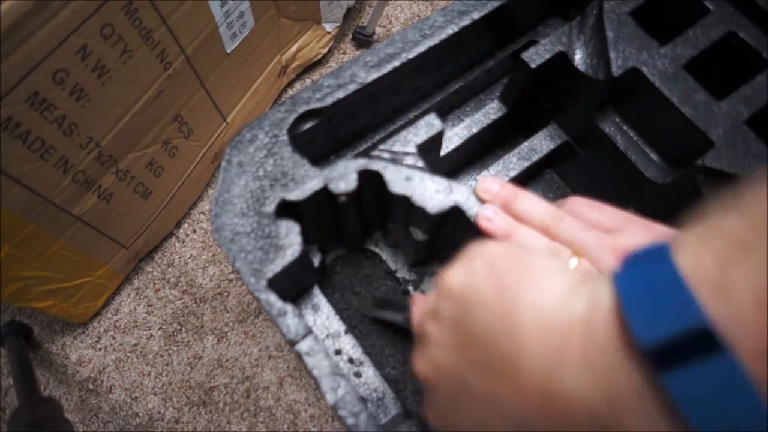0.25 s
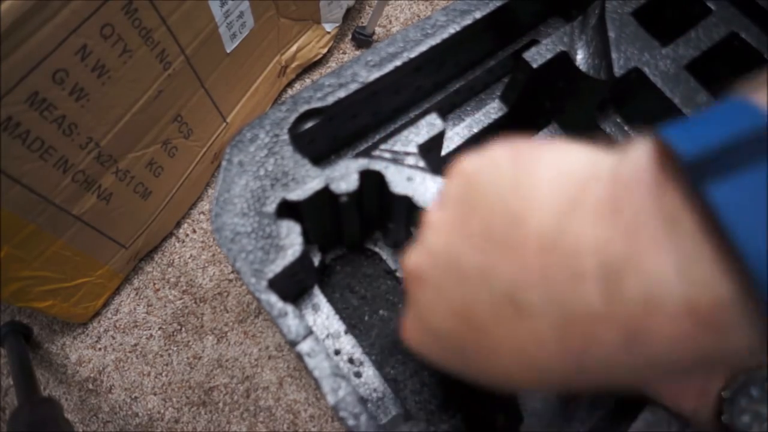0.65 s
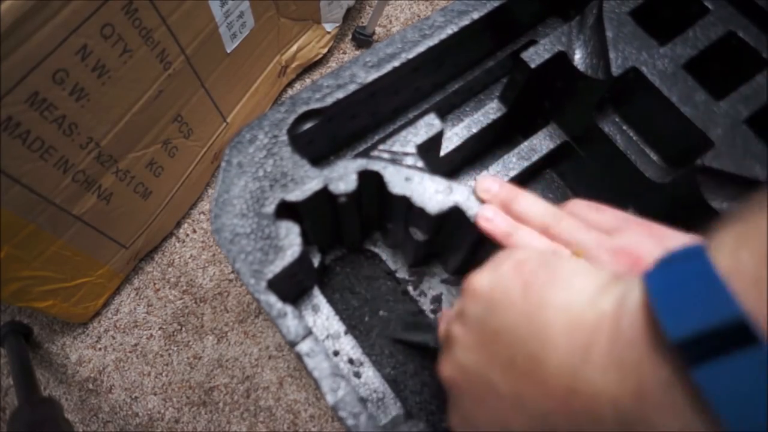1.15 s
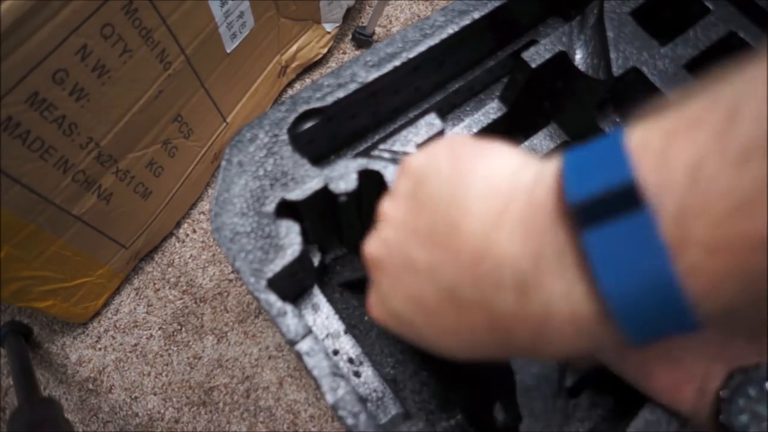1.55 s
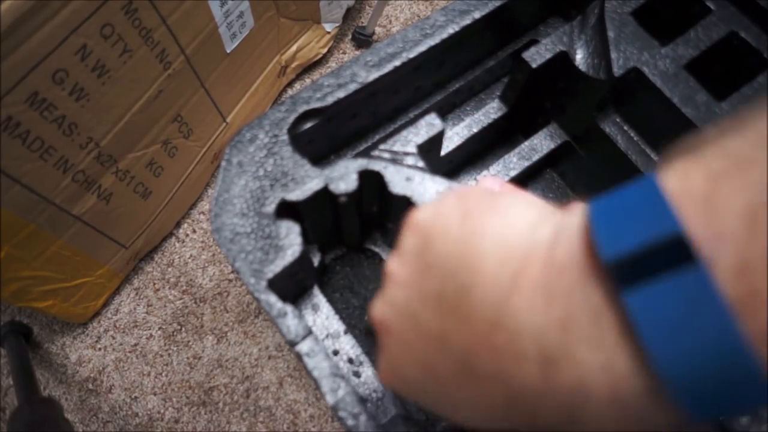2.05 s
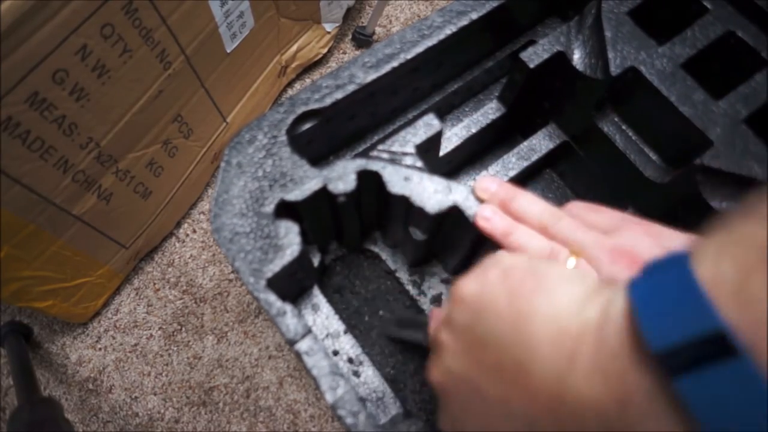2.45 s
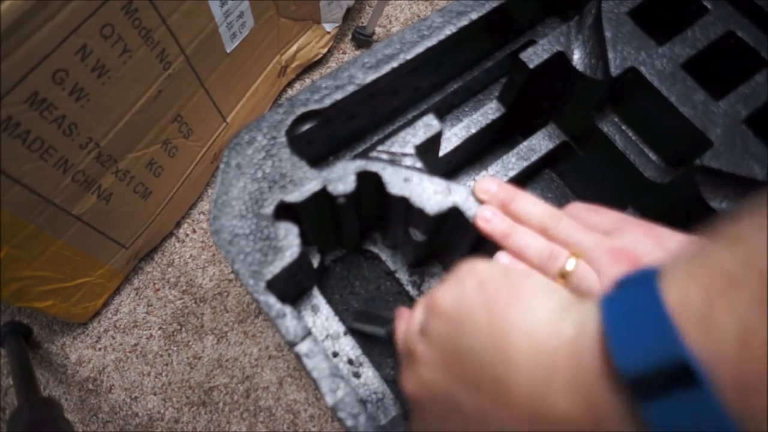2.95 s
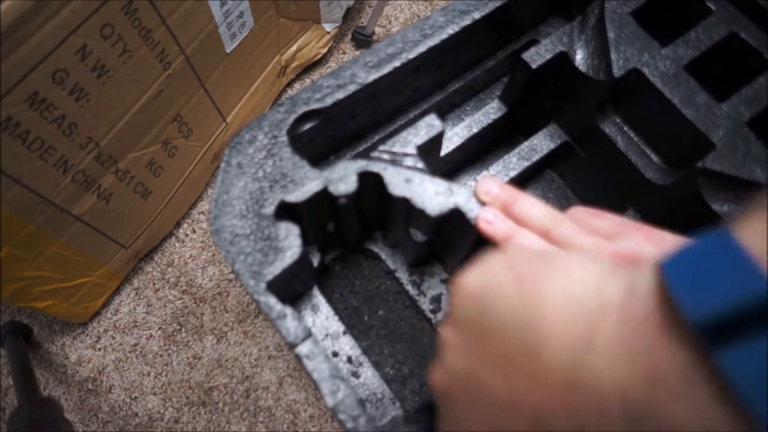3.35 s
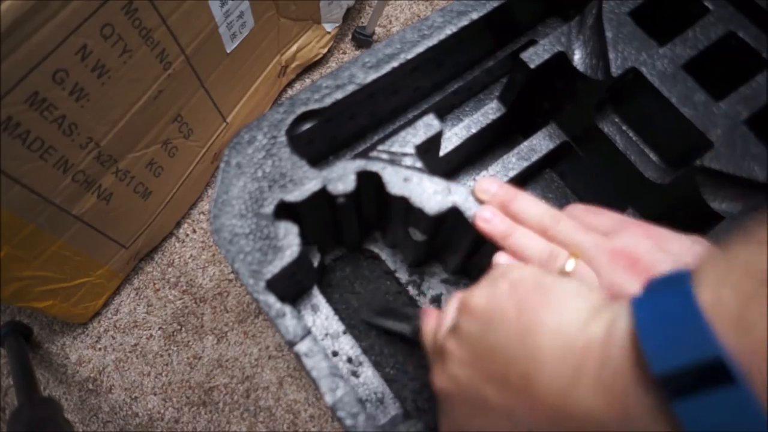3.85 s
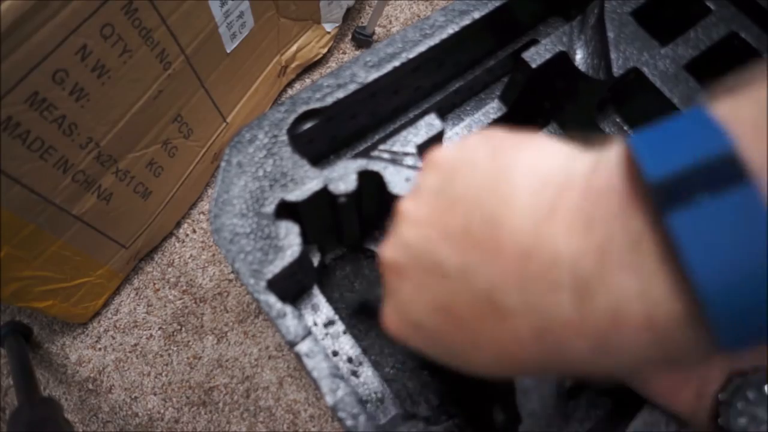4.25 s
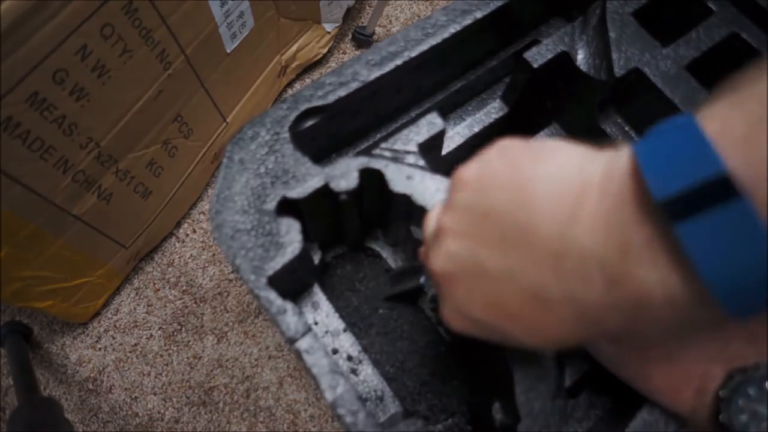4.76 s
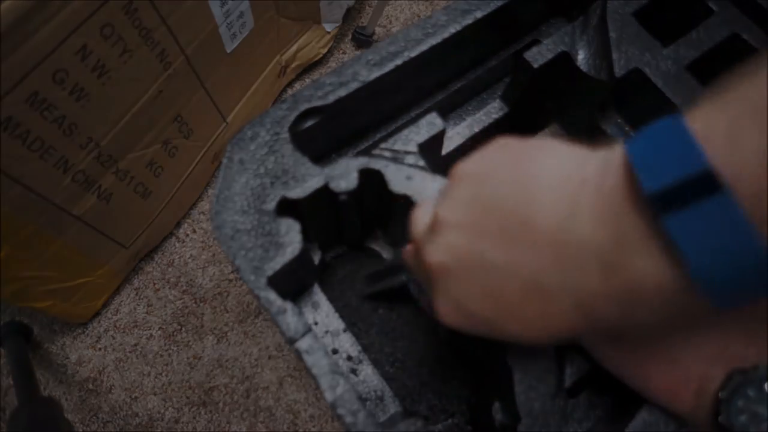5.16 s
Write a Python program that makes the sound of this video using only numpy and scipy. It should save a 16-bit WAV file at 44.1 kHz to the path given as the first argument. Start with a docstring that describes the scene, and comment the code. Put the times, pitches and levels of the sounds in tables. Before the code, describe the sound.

Short gritty scrapes through brittle foam, crackling and popping as tiny beads break, repeat about every two thirds of a second indoors.

```python
"""A faint room hum and a light rustle of the blade come first; then a flat chisel cuts bead foam in eight short strokes.
Each stroke is a few pushes that crush a stream of tiny beads, made as random bursts through minimum-phase clicks.
Single beads snap off: shaped noise forces excite damped resonances, as a crack, a tick of the blade and a thump of the foam.
Soft knocks of the block are decaying sines. Convolution adds the ceiling echo and short tail of a small carpeted room."""
import sys
import numpy as np
from scipy import signal
from scipy.fft import rfft, irfft, next_fast_len
from scipy.io import wavfile
from scipy.ndimage import uniform_filter1d

SR = 44100
rng = np.random.default_rng(int(sys.argv[2]) if len(sys.argv) > 2 else 0)


def master_out(mix):
    """Clip the mix to full scale and print it as 16-bit PCM to the path in sys.argv[1]."""
    frames = np.transpose(np.atleast_2d(mix))
    ceiling = np.clip(frames, -1, 1)
    pcm = np.round(ceiling * 32767).astype(np.int16)
    wavfile.write(sys.argv[1], SR, pcm)


N = 237775
TIME = np.arange(N) / SR
SIDES = np.array([[1], [-1]])  # sign of the side signal in left and right
CLICK_SIZE = 1024  # samples
CLICK_HZ = np.fft.rfftfreq(CLICK_SIZE, 1 / SR)
PADDED = next_fast_len(N, real=True)
FINE_HZ = np.fft.rfftfreq(PADDED, 1 / SR)


def undb(db):
    """Level law: decibels to amplitude gain."""
    return 10 ** (np.asarray(db) / 20)


def at(points, hz):
    """Logarithmic frequency scale: interpolate (f/Hz, value) points along it."""
    f, value = np.transpose(points)
    return np.interp(np.log(hz + 1), np.log(f), value)


def colour(x, points):
    """Zero-phase filtering: weight the spectrum by (f/Hz, gain/dB) points."""
    count = next_fast_len(x.shape[-1], real=True)
    gain = undb(at(points, np.fft.rfftfreq(count, 1 / SR)))
    return irfft(rfft(x, count) * gain, count)[..., :x.shape[-1]]


def lift(resonances, hz):
    """Resonance curves: the summed dB of (f/Hz, width/Hz, height/dB) peaks."""
    return sum(db / (1 + (2 * (hz - centre) / width) ** 2) for centre, width, db in resonances)


def unit(x):
    """Energy normalization: a mean energy of one per channel."""
    return x / np.sqrt(np.mean(np.sum(x ** 2, axis=-1)))


def add(out, s, sound):
    """Superposition: mix a sound in from a given time."""
    start = max(int(s * SR), 0)
    part = out[:, start:start + sound.shape[-1]]
    part += sound[..., :part.shape[-1]]


# Stereo width of the room sound: f/Hz, side against mid level/dB
ROOM_WIDTH = [(40, -9.5), (250, -15.5), (600, -10.5), (1500, -7), (4000, 0.5), (10000, -3.5)]


def diffuse(count):
    """Diffuse field: independent mid and side noises arrive from all around."""
    mid, side = rng.standard_normal((2, count))
    return mid + SIDES * colour(side, ROOM_WIDTH)


# Spectrum of the steady background: f/Hz, relative level/dB
HUM_SPECTRUM = [(25, -1), (50, -18), (90, -8), (200, -8), (330, 2.5), (500, -1.5), (700, -3.5),
                (1000, -5.5), (1500, -10), (2500, -16.5), (4300, -22), (6000, -22.5), (8000, -13.5),
                (11000, -33)]
# Narrow humming bands in it: f/Hz, width/Hz, height/dB
HUM_BANDS = [(111, 20, 12.5), (166, 25, 7.5), (243, 6.9, 8), (370, 20, -1), (467, 8, 14)]


def hum(rms_db=-63):
    """Stationary noise: faint room air with a few narrow bands shaped by resonance curves."""
    gain = undb(at(HUM_SPECTRUM, FINE_HZ) + lift(HUM_BANDS, FINE_HZ))
    air = irfft(rfft(diffuse(PADDED)) * gain, PADDED)[:, :N]
    return undb(rms_db) * np.sqrt(N) * unit(air)


def even(x, size=48):
    """Spectral whitening: level a noise across frequency but keep its fine grain."""
    spectrum = rfft(x)
    power = uniform_filter1d(np.mean(np.abs(spectrum) ** 2, axis=0), size=size)
    return irfft(spectrum / np.sqrt(power), x.shape[-1])


# Colour of the room tail: f/Hz, gain/dB
TAIL_COLOUR = [(60, 13.5), (200, -5.5), (450, -1.5), (700, -4.5), (1200, -1), (2000, 2), (3000, -2),
               (5000, -2), (8000, -3.5), (11000, -0.5)]
# Reverberation time of each band: f/Hz, t60/s
TAIL_DECAY = [(150, 0.3), (400, 0.47), (1040, 0.5), (2760, 0.36), (7280, 0.46), (11000, 0.29)]
# Standing waves of the room: f/Hz, initial level in the response/dB, t60/s
STANDING_WAVES = [(365.6, -65, 0.55), (398, -68.5, 0.16), (465, -81.5, 0.81), (505, -71.5, 1)]


def room(near, tail_db=-8, echo_s=0.015, echo_db=-17):
    """Linear room response: a ceiling echo, a diffuse tail with its own decay per band, and standing waves."""
    t = TIME[:SR * 3 // 4]
    hz = np.fft.rfftfreq(len(t), 1 / SR)
    noise = rfft(diffuse(len(t)))
    centres, t60s = np.transpose(TAIL_DECAY)
    tail = 0
    for share, t60 in zip(np.eye(len(centres)), t60s):
        band = irfft(noise * at(np.c_[centres, share], hz), len(t))
        tail = tail + band * np.exp(-np.log(1000) * t / t60)
    # the reflections build up over some milliseconds; the second half fades to zero
    build_up = 1 - np.exp(-t / 0.011)
    fade = np.clip(2 - 2 * t / t[-1], 0, 1) ** 2
    response = undb(tail_db) * unit(colour(even(tail), TAIL_COLOUR) * build_up * fade)
    response[:, int(echo_s * SR)] += undb(echo_db)
    for mode_hz, db, t60 in STANDING_WAVES:
        response += undb(db - 60 * t / t60) * np.sin(2 * np.pi * mode_hz * t)
    source = near.mean(axis=0)[None]
    return signal.fftconvolve(source, response, axes=1)[:, :N]


def rustle(start_s=0.02, length_s=0.063, rms_db=-58):
    """Friction noise: the blade skims the surface lightly at the very start, as a swelling hiss."""
    count = int(length_s * SR)
    hiss = colour(diffuse(count), [(3000, -31), (4800, 6), (6000, 5), (8000, -4)])
    out = np.zeros((2, N))
    add(out, start_s, undb(rms_db) * np.sqrt(count) * unit(hiss * np.hanning(count)))
    return out


# Soft knocks of hand and tool on the block: t/s, f/Hz, level before the soft onset/dB, t60/s
BLOCK_KNOCKS = [(0.891, 193, -49.5, 0.13), (0.918, 251, -46, 0.1), (0.926, 418, -44, 0.062),
                (2.724, 344.7, -36.5, 0.068), (2.737, 225, -46, 0.089), (2.739, 317, -45.5, 0.13),
                (2.739, 530, -49, 0.11), (3.188, 436, -22, 0.062), (3.201, 280, -33, 0.037),
                (3.742, 229, -42, 0.069), (5.093, 320, -31.5, 0.03), (5.227, 272.2, -44, 0.1),
                (5.282, 190.2, -44, 0.11)]


def knocks(onset_s=0.00093):
    """Free damped vibration: the bumped block rings low and briefly."""
    out, t = np.zeros((2, N)), TIME[:SR // 4]
    for s, hz, db, t60 in BLOCK_KNOCKS:
        envelope = undb(db - 60 * t / t60) * (1 - np.exp(-t / onset_s))
        add(out, s, envelope * np.sin(2 * np.pi * hz * t))
    return out


def ripple(count):
    """Random spectral variation: a smooth curve over frequency with unit spread."""
    curve = uniform_filter1d(uniform_filter1d(rng.standard_normal(len(CLICK_HZ)), count), count)
    return curve / curve.std()


def click(db):
    """Minimum phase: the causal click with this dB spectrum, by folding its cepstrum."""
    cepstrum = irfft(db * np.log(10) / 20)
    cepstrum[1:CLICK_SIZE // 2] *= 2
    cepstrum[CLICK_SIZE // 2 + 1:] = 0
    return irfft(np.exp(rfft(cepstrum)))


# Stereo width of the near sound: f/Hz, side against mid level/dB
NEAR_WIDTH = [(200, -20), (1000, -11.5), (3000, -9), (8000, -7), (11000, -3.5)]


def ports(x):
    """Path difference: a click reaches the two microphones along slightly different short paths."""
    t = np.arange(CLICK_SIZE) / SR
    paths = unit(rng.standard_normal(CLICK_SIZE) * np.exp(-t / 0.00029))
    side = colour(signal.fftconvolve(x, paths)[:CLICK_SIZE], NEAR_WIDTH)
    return x + SIDES * side


# Pushes of the blade, a few to each stroke: start t/s, length/s, starting level/dB,
# brightness/dB (treble against bass), boom of the block/dB, starting pitch of the foam f/Hz
PUSHES = [(0.175, .02, -48, 1.5, 8, 1190), (0.218, 0.023, -33.5, 0.5, 5.5, 1100),
          (0.258, .105, -38.5, -4, -3.5, 870), (0.41, 0.11, -36.5, -4.5, -0.5, 1060),
          (0.984, 0.039, -39.5, -8, -3, 1130), (1.04, 0.063, -41, -4, -5, 1000),
          (1.098, 0.15, -30.5, 2, -5, 860), (1.685, 0.072, -33, -2, 5.5, 1120),
          (1.795, 0.13, -36.5, 1, -1, 876), (2.318, 0.067, -32.5, 0, 0.5, 1059),
          (2.425, 0.032, -34.5, -4.5, -1.5, 901), (2.468, 0.083, -34, -2.5, -6, 755),
          (2.93, 0.058, -37, -1.5, 2.5, 755), (3.03, 0.11, -38, -1, -3, 870),
          (3.142, 0.061, -32, -7, 2.5, 537), (3.21, 0.071, -39.5, 1.5, 8.5, 900),
          (3.74, .038, -34, 0.5, -1.5, 1040), (3.803, 0.022, -43, -3.5, -13, 1096),
          (3.878, 0.089, -34.5, -0.5, -5.5, 840.2), (3.99, 0.1, -34.5, 0.5, -3.5, 650),
          (4.592, 0.02, -36, -2, 3, 1150), (4.636, .067, -36, -6, 0.5, 1160),
          (4.725, .06, -55, 1.5, 6, 890), (5.08, 0.025, -40.5, -5, 7, 654),
          (5.143, 0.13, -32.5, 1, -0.5, 1140)]


def effort(bite_s=0.0019, release_s=0.0063, tire_db_per_s=19.5):
    """Force envelope: the crushing amplitude of each push bites, tires slowly and lets go."""
    out = []
    for s, length, db, *_ in PUSHES:
        age = np.maximum(TIME - s, 0)
        hold = undb(db - tire_db_per_s * age)
        bite = np.minimum(age / bite_s, 1)
        release = np.exp(-np.clip((age - length) / release_s, 0, 20))
        out.append(hold * bite * release)
    return np.array(out)


def foam_pitch(sink_oct_per_s=3.7):
    """Moving resonance: each push finds its own foam pitch, which sinks while the blade digs in."""
    pitch = np.full(N, float(PUSHES[0][-1]))
    for s, length, *_, hz in PUSHES:
        start = int(s * SR)
        pitch[start:] = hz * 2 ** (-sink_oct_per_s * np.minimum(TIME[start:] - s, length))
    return uniform_filter1d(pitch, size=600)


def swell(s, length):
    """Smooth envelope: a rise and fall centred on a moment."""
    return np.maximum(1 - (2 * (TIME - s) / length) ** 2, 0) ** 2


def flicker(spread_db=2.2, changes_per_s=30):
    """Random modulation: a level in dB that wanders between random points."""
    steps = np.arange(0, TIME[-1] + 1, 1 / changes_per_s)
    return spread_db * np.interp(TIME, steps, rng.standard_normal(len(steps)))


def hollow(x, depth_db=6, octaves=0.26, trim_db=-2.0, count=9):
    """Moving formant: the foam under the edge favours bands near its pitch, each a little unevenly."""
    centres = np.geomspace(250, 2600, count)
    pitch = foam_pitch()
    spectrum = rfft(x, PADDED)
    out = x
    # the last band, which holds everything above, stays as it is
    for centre, share in zip(centres[:-1], np.eye(count)):
        closeness = np.exp(-.5 * (np.log2(centre / pitch) / octaves) ** 2)
        db = trim_db + flicker() + depth_db * closeness
        band = irfft(spectrum * at(np.c_[centres, share], FINE_HZ), PADDED)[:, :N]
        out = out + (undb(db) - 1) * band
    return out


# Colour of the crushing: f/Hz, gain/dB
CRUSH_COLOUR = [(24, -64.5), (40, -41), (85, -27.5), (174, -8.5), (254, -7.5), (408, 0.5), (686, -1.5),
                (1030, -3.5), (1360, -1.5), (2410, -6), (3130, -7.5), (4150, -13.5), (8650, -9.5),
                (10700, -24), (11500, -9), (15000, -40), (22000, -120)]
# Resonances of block and blade, also heard in the snaps: f/Hz, width/Hz, height/dB
BODY_RESONANCES = [(404, 33, 1), (491.5, 24.5, 4.5), (685, 50, 1), (1345, 150, 1.5), (1713, 160, 2),
                   (2763, 33, 3), (3102, 78, 3.5), (8160, 6300, 7)]


def beads(level_db, rate=2100, scatter_db=5.5, variety_db=5.0, size_db=6, count=20):
    """Shot noise: tiny beads burst at random, coarse kinds darker and fine ones brighter (rate per s)."""
    happens = rng.random(N) < rate / SR
    bursts = happens * undb(scatter_db * np.minimum(rng.exponential(size=N), 4))
    # level the running power of the random bursts, so that level_db sets the loudness
    bursts /= np.sqrt(np.maximum(uniform_filter1d(bursts ** 2, size=500), 1e-6))
    bursts *= rng.choice([-1, 1], N) * undb(level_db)
    kind = rng.integers(count, size=N)
    tilt = at([(700, -1), (8000, 1)], CLICK_HZ)
    common_db = at(CRUSH_COLOUR, CLICK_HZ) + lift(BODY_RESONANCES, CLICK_HZ)
    out = 0
    for k, fineness in enumerate(np.linspace(-1, 1, count)):
        bead = unit(click(common_db + size_db * fineness * tilt + variety_db * ripple(count=10)))
        out = out + signal.oaconvolve((bursts * (kind == k))[None], ports(bead), axes=1)[:, :N]
    return out


def surges(rise_s=0.0038, fall_s=0.0043, surge_db=-31):
    """Avalanche: the power of small beads giving way, rising into each listed snap and falling after it."""
    energy = np.zeros(N)
    for s, _, *parts_db in SINGLE_SNAPS:
        energy[int(s * SR)] += np.sum(undb(parts_db) ** 2)
    t = np.arange(-2 * CLICK_SIZE, 2 * CLICK_SIZE + 1) / SR
    shape = np.exp(np.minimum(t / rise_s, -t / fall_s))
    return undb(surge_db) ** 2 * np.maximum(signal.oaconvolve(energy, shape, "same"), 0)


# The blade skims the surface between cuts: middle t/s, length/s, peak level/dB, brightness/dB
SKIMS = [(0.143, 0.033, -55.5, -12), (0.86, .035, -59.5, -23), (1.288, 0.029, -32, 5.5),
         (1.561, 0.12, -64.5, -11), (1.98, .06, -56, 7.5), (2.228, 0.052, -47.5, 7),
         (2.29, 0.11, -45.5, 6.5), (2.733, .035, -35.5, 5), (2.823, 0.025, -39.5, 3),
         (2.897, 0.041, -39, 16), (3.65, 0.046, -46, 1), (3.723, 0.051, -44, 8.5), (4.477, 0.13, -55.5, 8),
         (4.874, 0.06, -40, 10.5), (5.072, 0.086, -42, 6.5), (5.303, 0.044, -41.5, 4.5),
         (5.356, 0.077, -57, -16)]


def crushing(boom_hz=300):
    """Power summation: pushes and skims drive the bead stream, their power shares setting its tone."""
    skims = [undb(db) * swell(s, length) for s, length, db, _ in SKIMS]
    power = np.vstack([effort(), skims]) ** 2
    total = power.sum(axis=0) + 1e-12
    bright_db = np.array([row[3] for row in PUSHES + SKIMS]) @ power / total
    boom_db = np.array([row[4] for row in PUSHES]) @ power[:len(PUSHES)] / total
    stream = beads(10 * np.log10(total + surges()))
    low_pass = signal.butter(2, boom_hz, fs=SR, output="sos")
    stream = stream + (undb(boom_db) - 1) * signal.sosfiltfilt(low_pass, stream)
    # weighting what a darker copy leaves over tilts the tone between bass and treble
    dark = colour(stream, [(1100, 2.5), (2200, 3), (4500, -2.5)])
    balance = undb(bright_db)
    tilted = dark + balance * (stream - dark)
    return hollow(tilted) * np.sqrt(2 / (1 + balance ** 2))


def fracture(hz, q, tear_s, sharp_db, yield_s, skirt_db):
    """Source and filter: a break opens over yield_s, tears on for tear_s and excites a damped resonance."""
    t = np.arange(CLICK_SIZE) / SR
    tearing = np.exp(-t / tear_s) * (1 - np.exp(-t / yield_s))
    force = unit(rng.standard_normal(CLICK_SIZE) * tearing)
    # the first sharp break, its level set against the tearing
    force[int(abs(yield_s) * SR) + 1] += undb(sharp_db)
    detune = q * ((CLICK_HZ + 1) / hz - hz / (CLICK_HZ + 1))
    # a positive skirt steepens the far slopes, a negative one lifts them
    db = -10 * np.log10(1 + detune ** 2) - skirt_db * np.log10(1 + (detune / 3) ** 2)
    resonance = click(db + lift(BODY_RESONANCES, CLICK_HZ))
    return unit(signal.fftconvolve(force, resonance)[:CLICK_SIZE])


def snap(hz, thump_db, tick_db, crack_db):
    """Parallel resonators: a bead cracks, ticks the blade and thumps the foam, which gives way more slowly."""
    blade, bead = np.exp(0.044 * rng.standard_normal(2))  # slight scatter of the two pitches
    thump = fracture(hz, q=1.27, tear_s=0.0019, sharp_db=-3.0, yield_s=.0005, skirt_db=12.5)
    tick = fracture(3080 * blade, q=2, tear_s=.0016, sharp_db=-1, yield_s=0.00016, skirt_db=-3.5)
    crack = fracture(8200 * bead, q=4.0, tear_s=.0008, sharp_db=-1, yield_s=.00008, skirt_db=1.0)
    mix = undb(thump_db) * thump - undb(tick_db) * tick + undb(crack_db) * crack
    return ports(rng.choice([-1, 1]) * mix)


# Single snaps that stand out, loud ones and a few faint isolated ticks:
# t/s, pitch of the foam's thump f/Hz, energy level/dB of the thump, of the blade's tick and of the crack
SINGLE_SNAPS = [(0.0233, 1090, -23, -48, -45.5), (0.1336, 1020, -26.5, -25, -27),
                (0.1769, 920, -14, -12.5, -23), (0.1813, 960, -9.5, -15, -7.5),
                (0.1924, 1330, -7.5, -13, -21), (0.2189, 1140, -13.0, -12.5, -9),
                (0.2272, 1050, -6, -6.5, -16), (0.2354, 860, -11.5, -12, -5), (0.2642, 970, -2, -14, -27),
                (0.2875, 860, -3.5, -9, -6), (0.3183, 900, -16, -13.0, -2), (0.3535, 1580, -4, -27, -8),
                (0.3779, 980, -24, -25, -5.5), (0.4257, 1300, -2.5, -14, -7),
                (0.4556, 1410, -6.5, -15, -4.5), (0.4663, 1340, -7, -28, -4), (0.4924, 1000, -5.5, -9, -6),
                (0.532, 950, -12.5, -5, -8.5), (0.966, 1200, -22.5, -27, -15),
                (0.9985, 1280, -8.0, -5, -13), (1.0231, 960, -10.5, -4, -16), (1.105, 990, -19, -15, -5),
                (1.1118, 1300, -7.5, -22, -2), (1.1823, 760, -4.5, -20, -7.5),
                (1.1928, 820, -10, -7.5, -14), (1.2029, 1080, -9, -23, -2), (1.254, 1640, -8.5, -18, -4),
                (1.2611, 1000, -18, -13, -4.5), (1.6196, 820, -53.0, -42.0, -35.5),
                (1.6865, 1200, -18, -14, -12.5), (1.7421, 1270, -10.0, -2.5, -5),
                (1.8035, 1080, -11, -7, -3.5), (1.8121, 740, -5.5, -9, -3), (1.8253, 1390, -33, -2, -2.5),
                (1.86, 680, -21, -2, -3), (1.8773, 860, -6.5, -2.5, -1.5), (1.9106, 1230, -8.5, -3.0, -28),
                (1.9712, 1080, -24, -3.5, -6.0), (1.9916, 700, -26.5, -19.5, -15),
                (2.2905, 1080, -14, -14.0, -3.5), (2.3083, 1020, -23, -9.5, -8),
                (2.3409, 940, -7.5, -5, -20), (2.3674, 960, -10.5, -5.5, -7), (2.4368, 1630, -12, -3, 0.5),
                (2.4514, 580, -17, -24, -7), (2.4747, 830, -26.5, -25, -1),
                (2.735, 970, -15.5, -16.5, -8.5), (2.8254, 1350, -16, -23, -33),
                (2.9134, 750, -18, -22, -15), (2.9332, 1240, -8, -6.5, -20), (2.9451, 700, -2.5, -18, -13),
                (2.9797, 890, -22, -8, -4.5), (3.06, 1110, -14.5, -7.5, -5), (3.0863, 1530, -15, -2.5, -16),
                (3.1013, 1450, -16, -12, -8), (3.1173, 1050, -2, -32, -8), (3.1604, 1320, -3, -21, -22),
                (3.1864, 850, -2, -17.5, -2), (3.2172, 820, -24.5, -3, -10), (3.2292, 1290, -22, -13, -3.5),
                (3.2385, 1050, -5, -19, -22), (3.2535, 1010, -16.0, -6, -5), (3.2659, 1400, -6.5, -14, -15),
                (3.6502, 1200, -14.0, -35, -27), (3.7423, 1300, -6.5, -25, -8),
                (3.7748, 1040, -5.5, -22, -2.5), (3.8145, 910, -6.5, -11, -3.5),
                (3.8824, 970, -15, -4, -3.5), (3.9013, 690, -11, -8, -3.5), (3.9534, 980, -1, -20, -3),
                (4.0162, 760, -6, -16, -0.5), (4.0312, 1160, -28, -8.5, -4.5),
                (4.595, 780, -22, -26, -16.5), (4.638, 1050, -16, -9.5, -6), (4.6834, 870, -13, -7.5, -16),
                (4.6964, 1030, -9.5, -4, -9), (4.7433, 820, -4, -3, -1.5), (4.7567, 680, -12.5, -14, -8.5),
                (4.7849, 1430, -9, -4, -30), (5.0935, 730, -8.5, -11, -10), (5.1588, 1120, -10, -11, -3),
                (5.1783, 1190, -7.5, -6.5, -18), (5.202, 1350, -9, -13, -28),
                (5.2131, 1070, -20, -2.5, -25), (5.2649, 1350, -14, -5, -20)]
# Lesser snaps: rate per s, energy of thump, tick and crack against the push/dB, scatter/dB
LESSER_PER_S, LESSER_DB, LESSER_SCATTER_DB = 36, (18, 18.5, 25.5), 4
# Their thump pitch: ratio to the foam's pitch, largest scatter either way/octaves
THUMP_RATIO, THUMP_SCATTER_OCT = 1.09, .18


def snaps():
    """Impulsive fracture: listed single snaps, and lesser ones at random in each push that follow the foam's pitch."""
    out = np.zeros((2, N))
    push, pitch = effort().sum(axis=0), foam_pitch()
    for s, hz, *parts_db in SINGLE_SNAPS:
        add(out, s, snap(hz, *parts_db))
    for start, length, *_ in PUSHES:
        count = max(round(length * LESSER_PER_S), 1)
        for s in start + length * rng.random(count):
            i = int(s * SR)
            hz = THUMP_RATIO * pitch[i] * 2 ** (THUMP_SCATTER_OCT * (2 * rng.random() - 1))
            scatter_db = LESSER_SCATTER_DB * np.clip(rng.standard_normal(3), -2, 1)
            push_db = 20 * np.log10(push[i] + 1e-9)
            add(out, s, snap(hz, *(push_db + LESSER_DB + scatter_db)))
    return out


def scene():
    """Superposition: the near sounds, their room response and the background."""
    near = rustle() + knocks() + crushing() + snaps()
    return hum() + room(near) + near


def record(dry, bass_hz=52, ceiling=.55, top_hz=10950):
    """Band limiting and saturation: thin the deep bass, round tall peaks and cut the top octave."""
    high_pass = signal.butter(1, bass_hz, "high", fs=SR, output="sos")
    x = signal.sosfilt(high_pass, dry)
    x = ceiling * np.tanh(x / ceiling)
    low_pass = signal.ellip(8, .2, 60, top_hz, fs=SR, output="sos")
    return signal.sosfilt(low_pass, x)


dry = scene()
out = record(dry)
master_out(out)
```